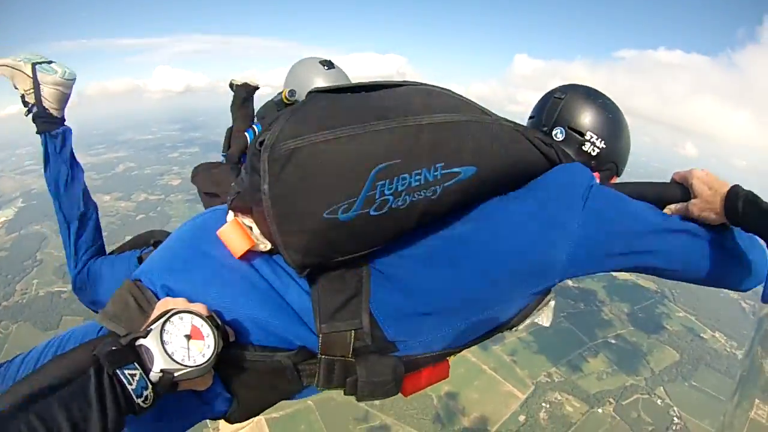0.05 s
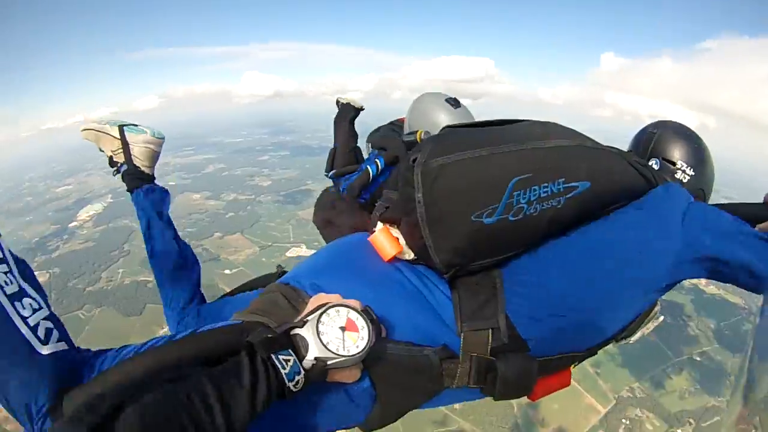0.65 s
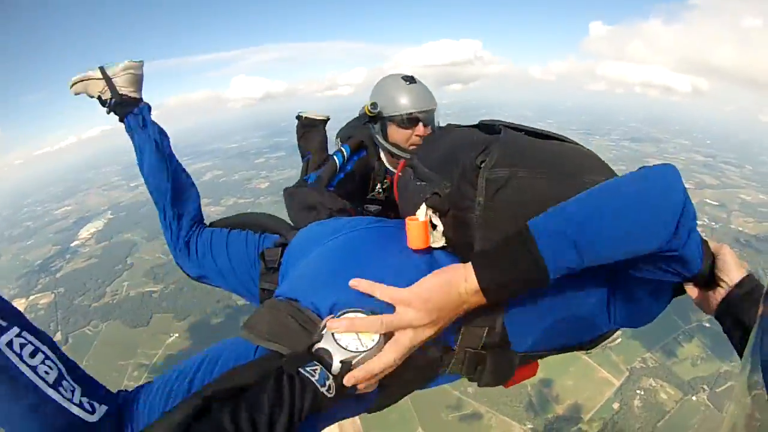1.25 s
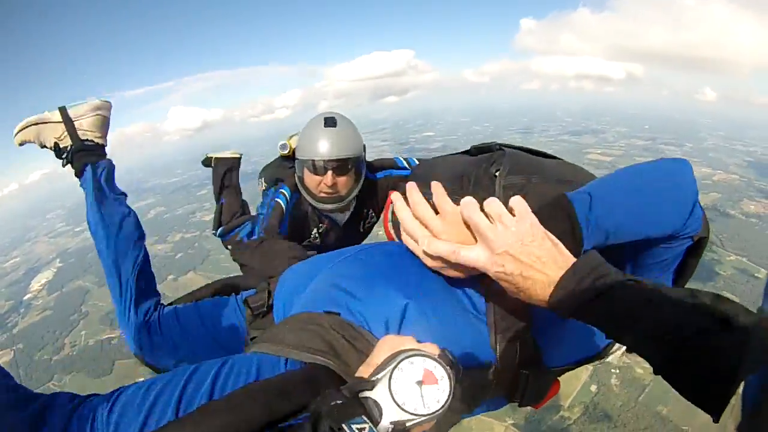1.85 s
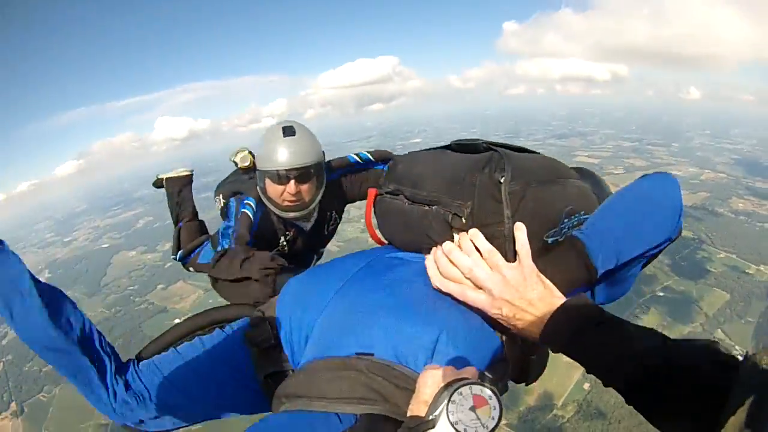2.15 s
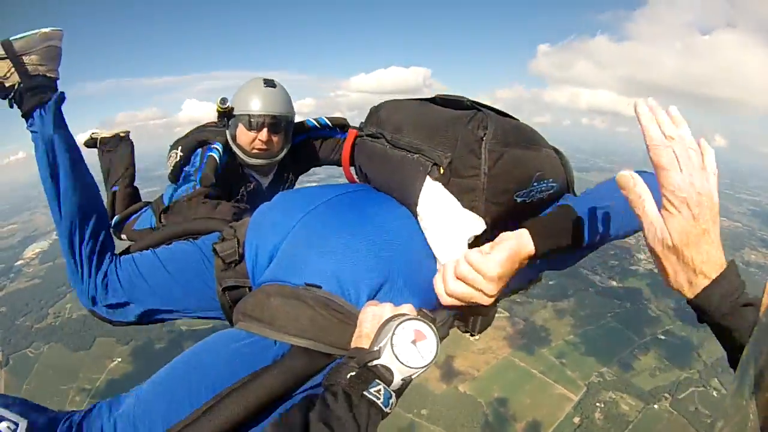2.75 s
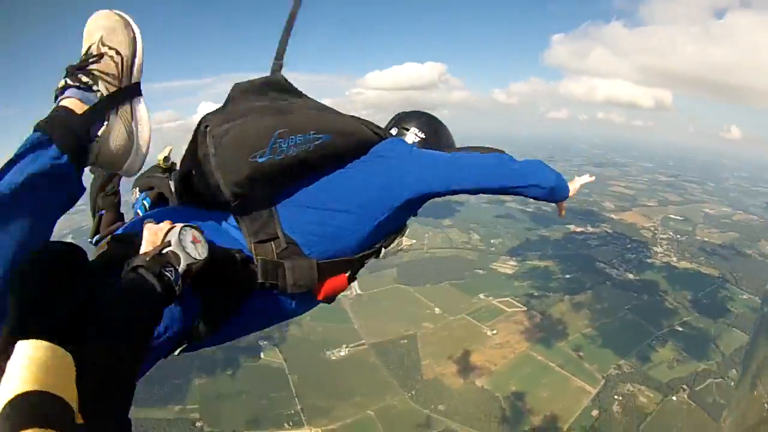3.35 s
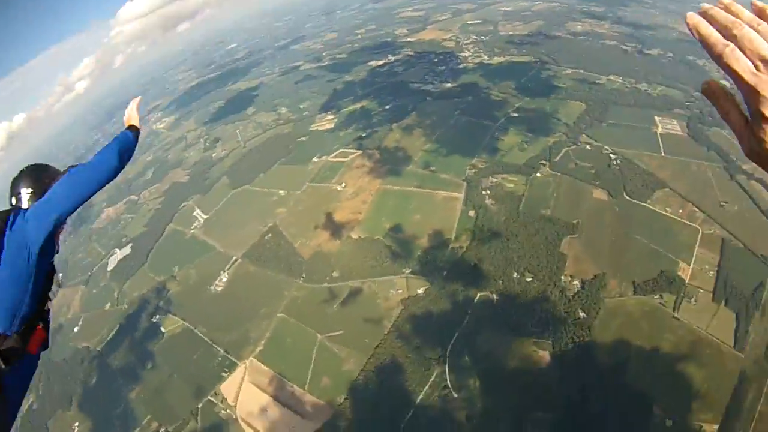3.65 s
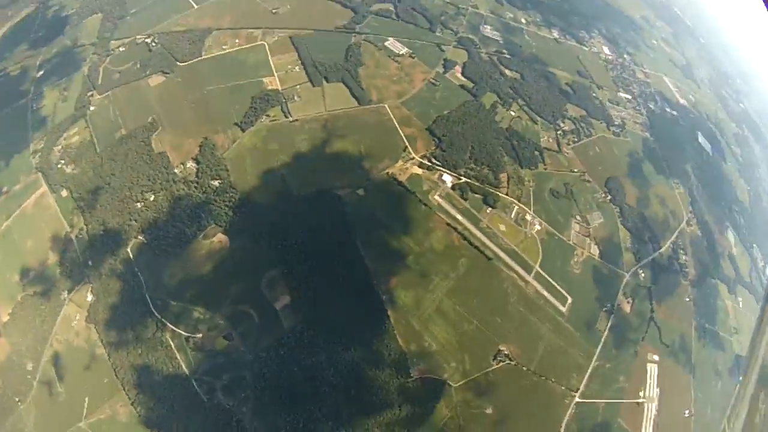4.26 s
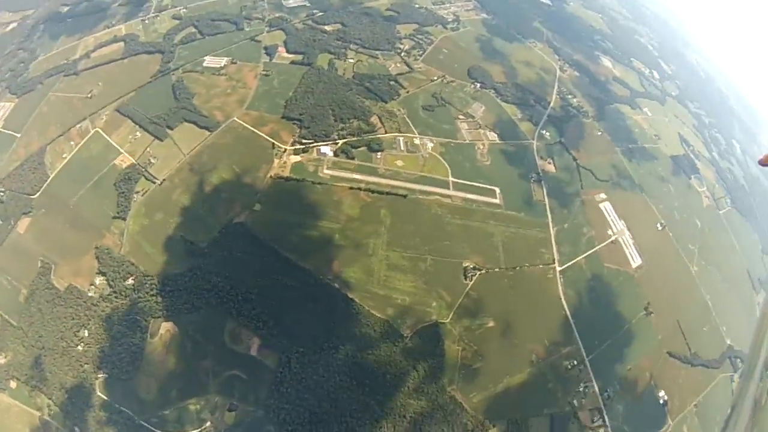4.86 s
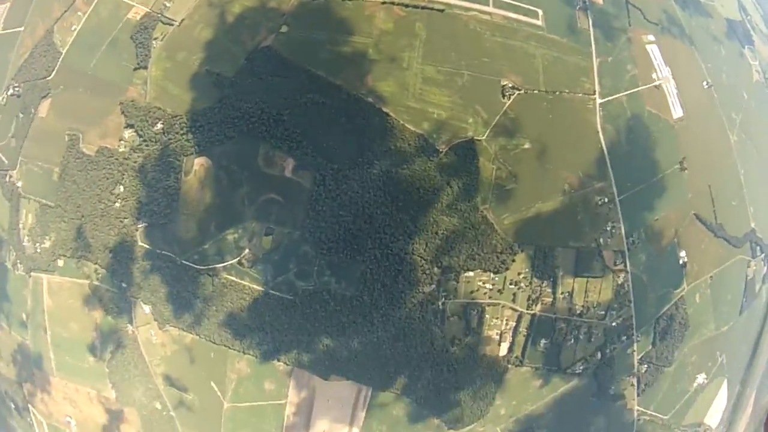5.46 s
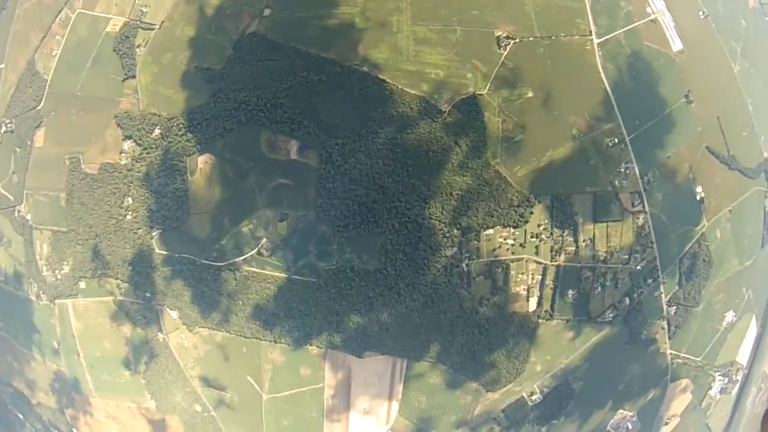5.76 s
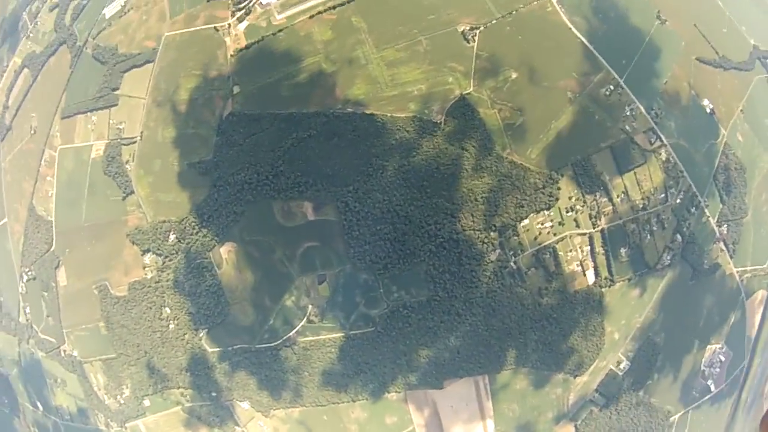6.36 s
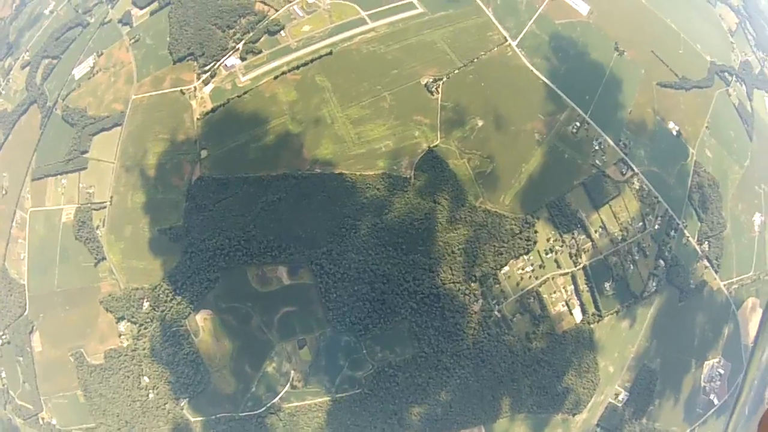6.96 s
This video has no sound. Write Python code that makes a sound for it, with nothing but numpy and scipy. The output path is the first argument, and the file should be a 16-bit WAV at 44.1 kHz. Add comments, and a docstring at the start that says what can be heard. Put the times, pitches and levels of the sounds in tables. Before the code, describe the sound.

Strong wind tears past a helmet-mounted microphone during a skydive, high in open air. The overloaded roar flutters unevenly, full of small thumps, pops and dry crackles over a low rumble. It eases briefly about two seconds in, then surges back, with one sharp gust a little past the middle. In the last two seconds the pops thin out and the rush becomes brighter and hissier.

```python
"""High in the sky, in freefall, air tears past a helmet camera at full speed.
Swirling air drives the microphone's diaphragm (the thin skin that picks up sound) against its stops,
the ends of its travel, so the roar sputters and pops. The shaking helmet rumbles underneath, and one
hard gust makes the camera housing hoot. Late on the helmet turns into smoother, faster flow:
fewer pops, a brighter rasp and more hiss."""
import sys
import numpy as np
from scipy import signal
from scipy.fft import rfft, irfft, next_fast_len
from scipy.io import wavfile
from scipy.ndimage import uniform_filter1d, minimum_filter1d, map_coordinates

SR = 44100
rng = np.random.default_rng(int(sys.argv[2]) if len(sys.argv) > 2 else 0)


def dump_mix(stems):
    """Bounce the given channels to the path in sys.argv[1] as a 16-bit WAV at rate SR."""
    frames = np.atleast_2d(stems).T  # one column per channel
    limited = np.clip(frames, -1, 1)  # hard clip at full scale
    pcm = np.round(limited * 32767).astype(np.int16)
    wavfile.write(sys.argv[1], SR, pcm)


N = 317520
TIME = np.arange(N) / SR
FFT_SIZE = next_fast_len(N + SR // 2, real=True)
HZ = np.fft.rfftfreq(FFT_SIZE, 1 / SR)


# Tone of the wind inside the closed housing: pitch_hz, level_db
HOUSING_TONE = [(12, -53), (35, -18.5), (70, -4.5), (120, -1.5), (250, -2), (400, -1.5), (700, -6.5),
                (1000, -14.5), (1700, -27.5), (2800, -45.5), (4200, -58), (5900, -57), (7500, -74),
                (13000, -100)]
# How the low buffeting rises and falls; it fades in smooth flow: time_s, level_db
BUFFET_LEVELS = [(0, -32.5), (1, -31.5), (2.4, -30.5), (3, -32), (4.9, -31), (5.4, -34.5), (7.2, -37.5)]
# How the roar rises and falls: time_s, level_db
ROAR_LEVELS = [(0, -21), (.58, -23.5), (.78, -23), (1.08, -21.5), (1.98, -21), (2.14, -27), (2.5, -24.5),
               (2.68, -21.5), (3.45, -21.5), (3.9, -24), (4.25, -20), (4.53, -21.5), (4.6, -24),
               (5.2, -24.5), (5.3, -20), (5.65, -21.5), (6.4, -22.5), (7.2, -20.5)]
# How the rasp follows the speed of the air over the microphone: time_s, level_db
RASP_LEVELS = [(0, -45.5), (.4, -44.5), (.8, -45.5), (1.95, -47), (2.2, -55), (2.48, -50.5), (2.8, -44.5),
               (3.04, -44), (3.2, -44), (3.9, -45.5), (4.45, -40), (4.68, -45), (5.12, -45.5),
               (5.38, -37.5), (6, -36), (6.35, -39), (7.2, -38.5)]


def wind(motion, gust_db, buffet_hz, split_hz, rasp_hz, tilt):
    """The overloaded diaphragm is heard as low buffeting, a roar in the middle and a high rasp."""
    roar_db, rasp_db, buffet_db = curve(ROAR_LEVELS), curve(RASP_LEVELS), curve(BUFFET_LEVELS)
    sound = coloured(motion, HOUSING_TONE)
    low, high = below(buffet_hz, order=6), 1 - below(rasp_hz, order=8)
    middle, lower = 1 - high - low, below(split_hz, order=4)
    # finer swirls of air strengthen the upper part of the roar
    fineness_db = rasp_db - buffet_db
    lift = amp(tilt * (fineness_db - np.median(fineness_db)))
    body = filtered(sound, middle * lower) + lift * filtered(sound, middle * (1 - lower))
    buffet = amp(buffet_db + 0.061 * gust_db) * levelled(filtered(sound, low), seconds=0.33)
    roar = amp(roar_db - 1.24 + gust_db) * levelled(body, seconds=0.032)
    rasp = amp(rasp_db + 2 + 0.68 * gust_db) * levelled(filtered(sound, high), seconds=0.15)
    return buffet + roar + rasp


# Tone of the swirling air pressure at the microphone: pitch_hz, level_db
PRESSURE_TONE = [(5, 0.5), (30, 8.5), (100, 0), (250, -6), (500, -16), (1000, -28), (2000, -43),
                 (4000, -67.5), (9000, -76), (20000, -105)]
# Moments when a long push lets go of the diaphragm: release_s
PUSH_RELEASES = [0.376, 0.557, 1.698, 1.868, 1.994, 2.353, 3.418, 3.507, 3.757, 3.842, 3.929, 4.053, 4.322,
                 4.366, 5.002, 5.262, 5.621, 6.334, 7.014]


def turbulence(smooth, push_db, push_s, burst_db):
    """Random pressure, strongest in the wake; each long push is followed by a burst of small swirls."""
    load_db = -0.5 - 7.5 * smooth + 0.4 * shelter_db()  # 0 dB is enough to reach the stops
    pressure = amp(load_db) * levelled(noise(PRESSURE_TONE), seconds=0.03)
    swirls = filtered(pressure, 1 - below(340, order=4))
    push, burst = np.zeros((2, N))
    for release_s in PUSH_RELEASES:
        near = around(release_s, reach_s=.04)
        progress = (TIME[near] - release_s) / push_s
        push[near] += np.exp(-(progress + 1) ** 4)
        burst[near] += np.exp(-(progress - 1) ** 4)
    return pressure * (1 - push - burst) + push * (amp(push_db) + swirls) + burst * amp(burst_db) * swirls


def diaphragm(pressure):
    """The diaphragm sticks at either stop, muting the small swirls, and thumps as it swings across."""
    fade = np.clip(np.minimum(TIME, TIME[::-1]) / .004, 0, 1)
    return pressure / np.sqrt(1 + pressure ** 2) * np.sin(fade * np.pi / 2) ** 2


# Single gusts: peak_s, swell_db, half_length_s
GUST_SWELLS = [(.568, 3, .014), (.605, 8, 0.013), (1.225, 2.5, 0.019), (1.91, 3.5, 0.01),
               (2.205, 4.5, 0.025), (3.435, 4.5, 0.018), (3.517, 3, 0.018), (3.775, 3.5, 0.024),
               (4.135, 1, 0.0091), (4.366, 20, 0.0055), (4.48, 1.5, 0.018), (4.54, -1.5, 0.0091),
               (4.99, 4.5, 0.014), (5.075, 10.5, 0.0054), (5.18, 4.5, 0.012), (5.23, 2.5, 0.014),
               (5.287, 8, 0.0067), (1.04, -2.5, 0.014), (1.16, 1, .02), (5.34, 1, 0.012), (5.77, 3.5, 0.01),
               (5.915, 2.5, 0.02), (6.012, 3, 0.017), (6.13, 4.5, 0.013), (6.21, 4.5, 0.0091),
               (6.34, 1, 0.0088), (6.46, 4, 0.029), (6.68, 4, 0.017), (6.775, 3, 0.012)]
# Moments when the wind drops away: time_s, dip_db
WIND_LULLS = [(.535, -5), (.635, -9), (.725, -10), (.85, -15), (2.275, -3), (2.335, -2), (2.415, -9),
              (2.482, -1), (2.91, -7), (3.35, -4.5), (3.74, -8), (3.825, -1.5), (4.101, -10), (4.313, -7),
              (4.343, -14.5), (4.426, -7.5), (4.59, -5.5), (4.642, -6), (4.805, -5.5), (5.11, -8),
              (5.204, -8), (5.255, -5), (5.528, -11.5), (5.581, -10), (5.812, -6), (5.96, -7), (6.185, -4),
              (6.365, -4.5), (6.621, -6), (6.727, -7)]


def gusts(smooth, flutter_db, changes_per_s):
    """The airstream swells and dips, in dB, over a random flutter that smooth flow calms a little."""
    wobble = map_coordinates(rng.standard_normal(1024), [TIME * changes_per_s], mode="mirror")
    gust_db = flutter_db * (1 - 0.3 * smooth) * wobble
    lulls = [(time_s, dip_db, .0093) for time_s, dip_db in WIND_LULLS]
    sags = [(release_s - .015, -1, .015) for release_s in PUSH_RELEASES]  # just before a push lets go
    for time_s, change_db, half_length_s in GUST_SWELLS + lulls + sags:
        near = around(time_s, reach_s=.15)
        gust_db[near] += change_db * bell(TIME[near] - time_s, half_length_s)
    return gust_db


def smoothness(midpoint_db, width_db):
    """Near 0 in the rough wake; nears 1 as fast, smooth air over the helmet raises the rasp."""
    return (1 + np.tanh((curve(RASP_LEVELS) - midpoint_db) / width_db / 2)) / 2


def shelter_db():
    """How deep the helmet lies in the wake (the churned-up air): dB of rasp below its usual level."""
    rasp_db = curve(RASP_LEVELS)
    return np.clip(np.median(rasp_db) - rasp_db, 0, None)


# The strongest whirls of air that slam the diaphragm: time_s, thump_db, snap_db, crack_db
STRONG_WHIRLS = [(0.0239, -17, -34, -41.5), (0.106, -21, -24.5, -51.5), (0.1478, -13, -42, -54),
                 (0.218, -21, -39.5, -55), (0.3449, -5, -25, -58.0), (0.3574, -13, -26, -51.5),
                 (0.3794, -3, -30.5, -55.0), (0.4223, -9, -34.5, -52.0), (0.4801, -9, -41, -59),
                 (0.6052, -12, -30, -56), (0.6637, -17, -37, -54), (0.7441, -11.5, -32, -52.5),
                 (0.8356, -10.5, -30, -55.5), (0.8686, -11, -30.0, -55), (0.9382, -14, -25, -54),
                 (1.0015, -5.5, -33, -53), (1.1545, -9, -28, -63), (1.2148, -7, -23, -57),
                 (1.2252, -7, -26, -55.0), (1.321, -4, -25, -56), (1.403, -8, -30, -50.0),
                 (1.5602, -14, -27, -55), (1.8165, -12, -25.5, -52.5), (1.9131, -22, -31, -59),
                 (1.9748, -18, -33, -52.5), (1.9991, -4.5, -23, -57.0), (2.048, -19, -40, -52),
                 (2.1147, -16, -37, -56), (2.1311, -20, -49, -56.0), (2.143, -18, -42, -54.5),
                 (2.1696, -12, -45, -55), (2.1917, -12.0, -33.5, -64), (2.208, -12, -32, -53.5),
                 (2.2581, -20, -39, -57.5), (2.2949, -8, -36.5, -59), (2.3179, -17, -45, -55),
                 (2.3513, -14.5, -47, -56), (2.363, -10.0, -37, -56), (2.398, -9.5, -31.5, -55),
                 (2.4325, -14, -32, -57), (2.4583, -15, -45, -61), (2.5101, -9.0, -33.5, -54),
                 (2.5485, -21, -43, -52.5), (2.6582, -10, -32, -59), (2.6676, -2, -32, -58),
                 (2.6934, -12, -32.5, -56), (2.7176, -11.0, -29, -56), (2.7726, -11, -32, -55),
                 (2.7959, -19, -35, -55), (2.8189, -11, -27, -54), (2.8288, -7, -25, -56),
                 (2.8484, -11, -27, -58), (2.9459, -16, -22, -55), (3.0427, -18, -34, -53.0),
                 (3.1195, -3, -30, -55.0), (3.2562, -10, -32.0, -55), (3.4192, -7, -38, -54.0),
                 (3.4476, -8, -33, -55), (3.5098, -11, -35, -60), (3.617, -12, -30, -55.0),
                 (3.7276, -8, -25, -49), (3.7648, -9, -33, -53), (3.863, -13, -29, -49),
                 (3.9006, -21, -42, -52), (3.9504, -19, -34, -51.5), (3.9892, -18, -25, -53),
                 (4.0539, -8, -27, -51), (4.1226, -16.5, -29, -54), (4.1355, -8, -24, -50),
                 (4.206, -12, -30, -53.0), (4.295, -6, -25, -49.5), (4.326, -12, -33, -54),
                 (4.3605, -12.0, -24, -51.5), (4.4166, -11, -44, -53.0), (4.5764, -20, -33, -56),
                 (4.6268, -7, -28, -53), (4.7195, -18, -30, -53), (4.7838, -17, -28.5, -50),
                 (4.9336, -15.0, -34, -53), (4.977, -14, -30, -55), (5.0801, -7, -39, -52),
                 (5.1832, -19, -35, -51.5), (5.2189, -27, -23, -55), (5.2363, -15, -31, -52),
                 (5.5686, -10.5, -37, -49), (6.552, -13, -26, -51), (6.6083, -9, -22, -48.0)]
# How often weak whirls come, thickest as the small pilot chute is thrown: time_s, whirls_per_s
WEAK_WHIRL_RATE = [(0, 3), (2.05, 3), (2.15, 0), (2.55, 0), (2.75, 40), (3.05, 40), (3.2, 4), (5.2, 4),
                   (5.4, 0), (7.2, 0)]


def whirls(thump_db, snap_db, crack_db, spread_db):
    """Strong whirls of air are joined by weak ones at random times, scattered around these levels."""
    count_so_far = np.cumsum(curve(WEAK_WHIRL_RATE)) / SR
    turns = np.arange(128) + rng.random(128)
    size_db = spread_db * rng.standard_normal(len(turns))
    times = np.interp(turns, count_so_far, TIME)
    inside = (times > .02) & (times < TIME[-1] - .02)
    weak = np.transpose([times, thump_db + size_db, snap_db + size_db, crack_db + size_db])
    return list(STRONG_WHIRLS) + list(weak[inside])


def pinned(pressure, slams, depth_db, hold_s):
    """Each whirl holds the diaphragm against its nearer stop for a moment, which mutes the roar."""
    pressure = pressure.copy()
    for time_s, *_ in slams:
        near = around(time_s)
        grip = bell(TIME[near] - time_s, hold_s)
        side = np.sign(np.sum(pressure[near] * grip))
        pressure[near] += side * amp(depth_db) * grip
    return pressure


def thumps(slams, directions, thump_gain_db, width_s, rebound_s, snap_gain_db, snap_hz):
    """A slam is one pressure spike, in or out, with a shallow rebound; its sharp tip makes a snap."""
    sound = np.zeros(N)
    for (time_s, thump_db, snap_db, _), direction in zip(slams, directions):
        near = around(time_s)
        t = TIME[near] - time_s
        spike = bell(t, width_s)
        rebound = np.exp(-np.abs(t) / rebound_s)
        thump = amp(thump_db + thump_gain_db) * (spike - rebound * spike.sum() / rebound.sum())
        tip = (np.pi * snap_hz * t) ** 2
        snap = amp(snap_db + snap_gain_db) * (1 - 2 * tip) * np.exp(-tip)
        sound[near] += direction * (thump + snap)
    return sound


# Tone of a crack: pitch_hz, level_db
CRACK_TONE = [(600, -21.5), (1800, 7), (3200, 4.5), (4500, -4.5), (6000, -7.5), (7500, -14), (10000, -23),
              (12500, -43.5)]


def cracks(slams, directions, click_gain_db, fizz_gain_db, decay_s):
    """A slammed diaphragm gives one hard, dry click inside a short fizz."""
    clicks, bursts = np.zeros((2, N))
    for (time_s, _, _, crack_db), direction in zip(slams, directions):
        near = around(time_s)
        clicks[round(time_s * SR)] += direction * amp(crack_db + click_gain_db)
        bursts[near] += amp(crack_db + fizz_gain_db) * np.exp(-np.abs(TIME[near] - time_s) / decay_s)
    fizz = bursts * levelled(noise(CRACK_TONE), seconds=0.0012)
    return filtered(clicks, unit(tone(CRACK_TONE))) + fizz


# The hoot of the housing: peak_s, pitch_hz, level_db, half_length_s
HOUSING_HOOT = (4.367, 620, -11.5, .007)


def hoot():
    """One hard gust blows across the housing, and the air inside gives a short, hollow note."""
    peak_s, pitch_hz, level_db, half_length_s = HOUSING_HOOT
    t = TIME - peak_s
    return amp(level_db) * bell(t, half_length_s) * np.sin(2 * np.pi * pitch_hz * t)


# Tone of the rumble: pitch_hz, level_db
RUMBLE_TONE = [(12, -33), (25, -10.5), (40, -4.5), (55, 1), (75, 0.5), (110, -9), (400, -80), (1000, -120)]
# How the rumble rises and falls: time_s, level_db
RUMBLE_LEVELS = [(0, -34.5), (1.95, -46.5), (2.1, -32.5), (2.45, -37), (2.8, -40.5), (4.2, -42.5),
                 (5.6, -34.5), (7.2, -34.5)]


def rumble(gain_db):
    """The shaking helmet hums through the camera mount, whatever the diaphragm does."""
    return amp(curve(RUMBLE_LEVELS) + gain_db) * levelled(noise(RUMBLE_TONE), seconds=.2)


# Tone of the hiss: pitch_hz, level_db
HISS_TONE = [(1500, -16.5), (2400, 7), (3000, -6.5), (3450, 3.5), (4100, -5), (5000, -6), (5900, -9),
             (6900, -16), (8400, -19.5), (9500, -27), (11000, -41.5), (13000, -63)]
# How the hiss rises and falls: time_s, level_db
HISS_LEVELS = [(0, -65.5), (2, -63), (2.15, -66.5), (2.5, -66), (2.7, -66), (3, -64), (3.7, -65),
               (4.75, -65), (5.45, -59), (6, -53), (6.35, -58), (7.2, -58)]


def hiss(motion, gust_db, smooth):
    """Air sliding past hisses, rising with the gusts and choked whenever the diaphragm lies at a stop."""
    choke = 0.94 + 0.06 * smooth
    freedom = 1 - choke * motion ** 2
    swell_db = (0.88 - 0.23 * smooth) * gust_db
    return amp(hiss_db() + swell_db) * unit(freedom * noise(HISS_TONE))


def hiss_db():
    """The level of the hiss before gusts; it sinks deep in the wake."""
    return curve(HISS_LEVELS) - .25 * shelter_db()


def crackle(motion, gain_db, steepness):
    """Only the fastest swings of the diaphragm tick: a fine, dry sputter that follows the hiss."""
    speed = unit(np.abs(np.gradient(motion)))
    ticks = unit(np.minimum(speed, 3.5) ** steepness)
    return amp(hiss_db() + gain_db) * ticks * noise(CRACK_TONE)


def amp(db):
    """Turn decibels into a multiplier."""
    return 10 ** (np.asarray(db) / 20)


def unit(x):
    """Scale to an average strength (rms) of 1."""
    return x / np.sqrt(np.mean(x ** 2))


def around(time_s, reach_s=.01):
    """The samples just before and after a moment."""
    return slice(max(0, round((time_s - reach_s) * SR)), round((time_s + reach_s) * SR))


def bell(t, half_length_s):
    """A smooth bump that peaks at t = 0."""
    return np.exp(-(t / half_length_s) ** 2)


def curve(rows):
    """Join (time_s, value) rows into one value per sample."""
    return np.interp(TIME, *np.transpose(rows))


def tone(points):
    """Join (pitch_hz, level_db) rows into a gain for every frequency."""
    pitch_hz, level_db = np.transpose(points)
    return amp(np.interp(np.log(HZ + 1), np.log(pitch_hz), level_db))


def filtered(x, gains):
    """Turn each frequency of x up or down."""
    return irfft(rfft(x, FFT_SIZE) * gains, FFT_SIZE)[:N]


def noise(points):
    """Noise of strength 1 with the given tone."""
    return unit(filtered(rng.standard_normal(FFT_SIZE), tone(points)))


def below(edge_hz, order):
    """Gains that keep the lows; a higher order cuts more sharply."""
    return 1 / (1 + (HZ / edge_hz) ** order)


def coloured(x, points):
    """Give x this overall tone, with a filter that rings only after each sound."""
    hz, power = signal.welch(x, SR, nperseg=2048)
    log_gain = np.log(tone(points)) - np.interp(HZ, hz, np.log(power)) / 2
    cepstrum = irfft(log_gain, FFT_SIZE)
    # move the ringing from before each sound to after it
    cepstrum[1:FFT_SIZE // 2] *= 2
    cepstrum[FFT_SIZE // 2 + 1:] = 0
    return unit(filtered(x, np.exp(rfft(cepstrum))))


def levelled(x, seconds):
    """Hold the strength near 1 over this span; faster flutter passes."""
    width = int(seconds * SR) + 1
    power = uniform_filter1d(uniform_filter1d(x ** 2, width), width)
    return x / np.sqrt(np.abs(power) + 1e-9)


def limited(x, ceiling_db):
    """A fast limiter eases the volume down around the tallest peaks."""
    needed = np.minimum(1, amp(ceiling_db) / (np.abs(x) + 1e-9))
    gain = minimum_filter1d(needed, size=301)
    return x * uniform_filter1d(uniform_filter1d(gain, size=151), size=151)


def scene():
    """One diaphragm carries the whole airstream, over the rumble of the helmet."""
    smooth = smoothness(midpoint_db=-40.5, width_db=3)
    gust_db = gusts(smooth, flutter_db=0.82, changes_per_s=30)
    slams = whirls(thump_db=-17, snap_db=-32, crack_db=-58, spread_db=2)
    directions = rng.choice([-1, 1], 256)
    air = turbulence(smooth, push_db=0.5, push_s=0.0036, burst_db=3)
    motion = diaphragm(pinned(air, slams, depth_db=1.5, hold_s=.0034))
    mix = wind(motion, gust_db, buffet_hz=179, split_hz=490, rasp_hz=1070, tilt=0.42)
    mix += hiss(motion, gust_db, smooth)
    mix += thumps(slams, directions, thump_gain_db=0.5, width_s=0.0005, rebound_s=0.0017,
                  snap_gain_db=2, snap_hz=1265)
    mix += cracks(slams, directions, click_gain_db=18, fizz_gain_db=5.5, decay_s=.0011)
    mix += crackle(motion, gain_db=-6, steepness=4.2)
    return (mix + hoot() + rumble(gain_db=-3))[None]


def record(dry):
    """The camera limits its peaks and cuts off the highest treble."""
    return filtered(limited(dry[0], ceiling_db=-8.4), below(edge_hz=12200, order=60))[None]


dry = scene()
out = record(dry)
dump_mix(out)
```